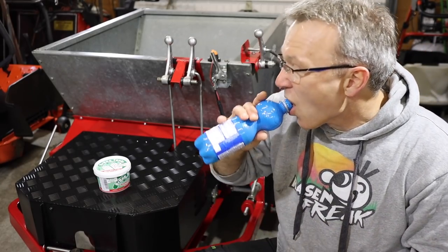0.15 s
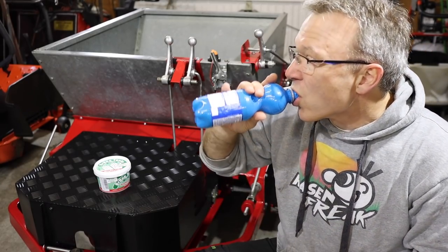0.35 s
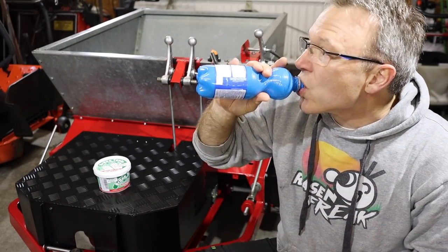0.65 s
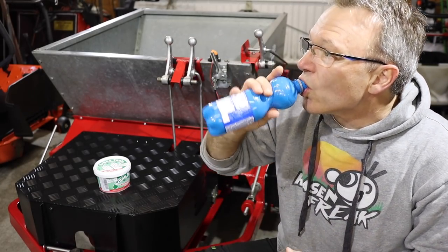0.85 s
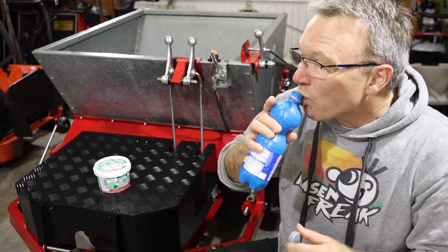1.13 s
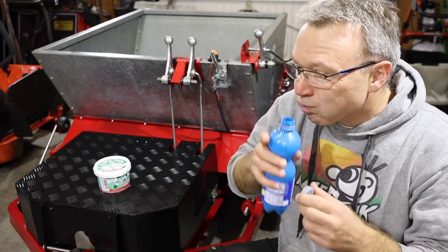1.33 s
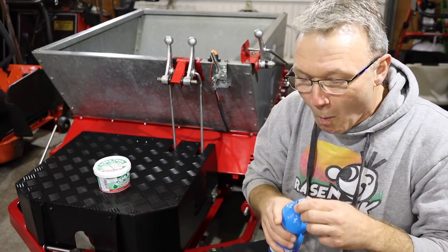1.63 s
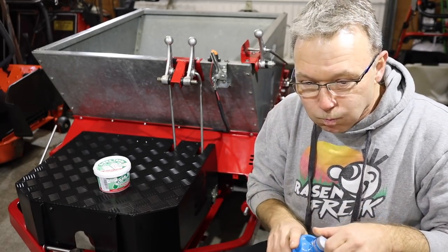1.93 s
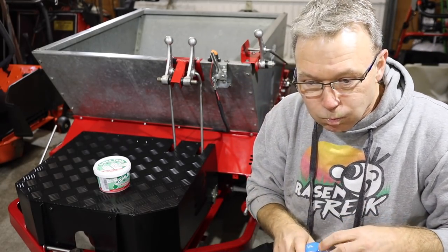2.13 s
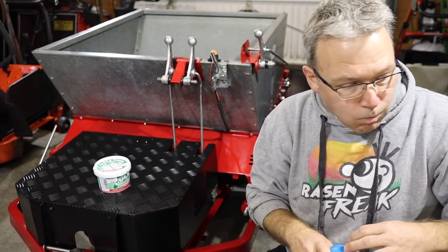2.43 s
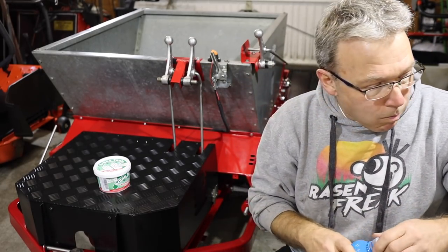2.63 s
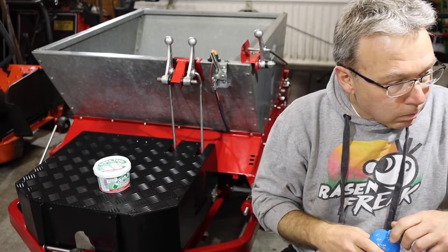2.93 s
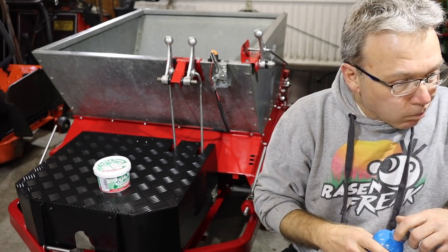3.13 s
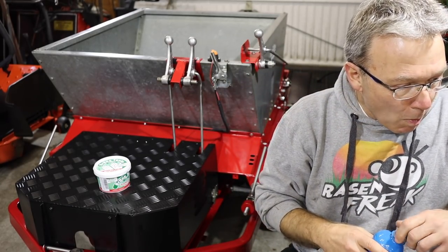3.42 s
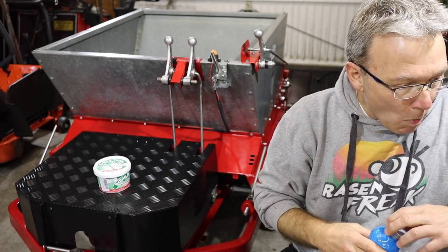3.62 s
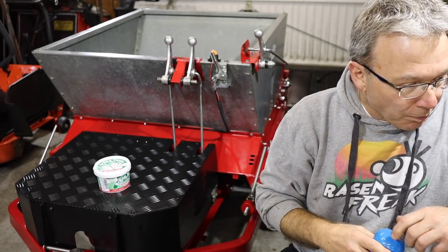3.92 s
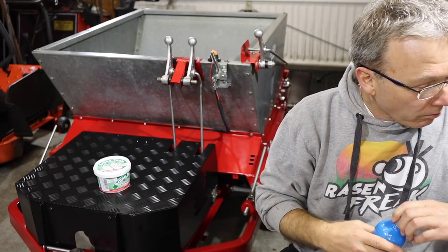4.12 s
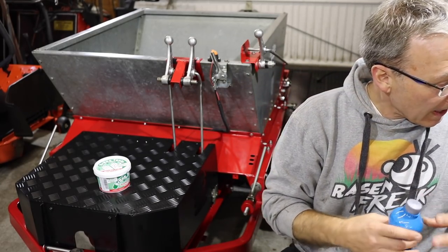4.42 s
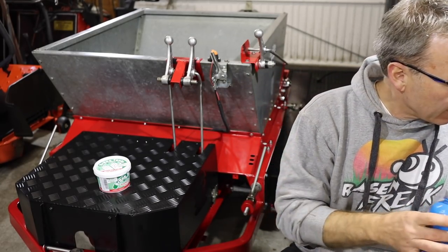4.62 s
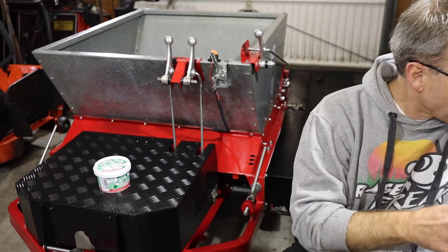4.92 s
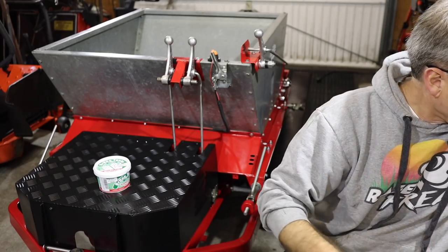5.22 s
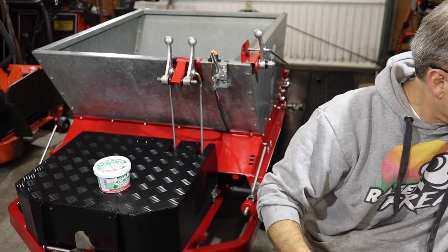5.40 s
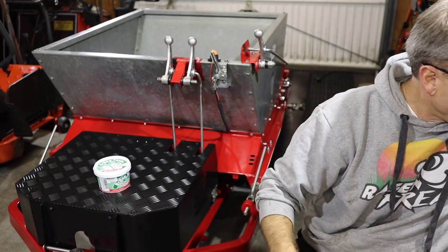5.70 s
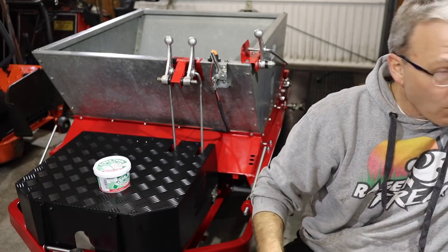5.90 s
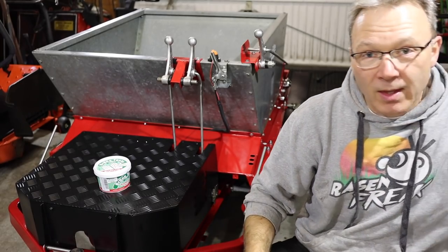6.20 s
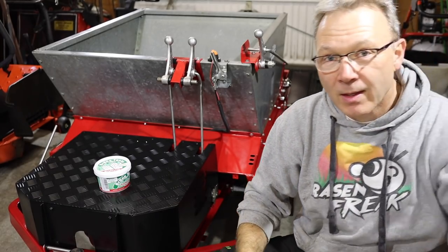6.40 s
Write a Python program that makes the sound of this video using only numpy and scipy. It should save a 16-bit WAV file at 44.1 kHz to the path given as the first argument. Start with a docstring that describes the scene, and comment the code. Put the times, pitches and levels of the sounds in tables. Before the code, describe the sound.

Loud, sharp plastic pops and gulping slosh from a drinks bottle, then crackly squeezing, a few clicks and cloth rustle in a quiet workshop.

```python
"""After a moment of soft hiss in a workshop, a thin plastic drinks bottle pops back loudly as the drinker lets go.
The water sloshes with ringing air pockets and small bubbles; the bottle crinkles in the hand in bursts of tiny
ringing ticks while the cap is screwed on, then it is put aside with a few clicks, knocks and short rough noises.
Snaps and rough noises are bursts of filtered noise or grains, knocks are damped notes.
The room rings briefly, a low hum grows, and the loudest snaps overload the microphone."""
import sys
import numpy as np
from scipy import signal
from scipy.fft import rfft, irfft, next_fast_len
from scipy.io import wavfile

SR = 44100
rng = np.random.default_rng(int(sys.argv[2]) if len(sys.argv) > 2 else 0)


def master(y):
    """Save y as 16-bit WAV."""
    cut = np.clip(np.atleast_2d(y).T, -1, 1)
    pcm = np.round(cut * 32767)  # scale
    wavfile.write(sys.argv[1], SR, pcm.astype(np.int16))


N = 288855
T = np.arange(N) / SR  # time of every sample, s


def amp(db):
    """Decibels to gain."""
    return 10 ** (np.asarray(db) / 20)


def unit(x):
    """Scale to an average strength (rms) of 1."""
    return x / np.sqrt(np.mean(x ** 2) + 1e-20)


def along(points, hz):
    """Read a curve of (Hz, value) points, with pitch on a log axis."""
    f, v = np.transpose(points)
    return np.interp(np.log(hz + 1), np.log(f + 1), v)


def level(rows, **ends):
    """Gain per sample from (s, dB) rows."""
    return amp(np.interp(T, *np.transpose(rows), **ends))


def colour(x, gain_db):
    """Filter x by a gain in dB that depends on frequency, with no sound ahead of its cause."""
    m = 2 * next_fast_len(len(x) // 2 + 2048)
    wanted_gain = amp(gain_db(np.fft.rfftfreq(m, 1 / SR)))
    # folding the cepstrum forward in time makes the filter minimum-phase
    cepstrum = irfft(np.log(wanted_gain + 1e-6), m)
    cepstrum[1:m // 2] *= 2
    cepstrum[m // 2 + 1:] = 0
    return irfft(rfft(x, m) * np.exp(rfft(cepstrum)), m)[:len(x)]


def shaped(x, points):
    """Filter x by a curve of (Hz, dB) points and scale it to rms 1."""
    return unit(colour(x, lambda hz: along(points, hz)))


def hump(hz, centre, octaves, depth_db):
    """A broad resonance in dB: 0 at its top, with skirts depth_db lower."""
    distance = np.log2((hz + 1) / centre) / octaves
    return depth_db * (np.exp(-.5 * distance ** 2) - 1)


def sized(x, db, length):
    """Give x the energy of a steady sound at db that lasts length seconds."""
    return x * amp(db) * np.sqrt(length * SR / np.sum(x ** 2))


def add(track, s, x):
    """Mix x into the track at time s."""
    part = track[max(round(s * SR), 0):][:len(x)]
    part += x[:len(part)]


def grains(size, rate, spread_db):
    """Tiny impulses at random times, about rate a second, of either sign and uneven strength."""
    present = rng.random(size) < rate / SR
    sign = rng.choice([-1, 1], size)
    return present * sign * amp(spread_db * np.clip(rng.standard_normal(size), -2, 2))


def patter(rate, pitch_hz, octaves, cycles, spread_db, rise):
    """A shower of tiny ringing grains, each at its own pitch around pitch_hz and its own strength; rms 1."""
    draws = rng.standard_normal((int(rate * N / SR), 2))
    start = rng.integers(N, size=len(draws))
    middle_hz = np.broadcast_to(pitch_hz, N)[start]
    hz = np.clip(middle_hz * 2 ** (octaves * draws[:, 0]), 150, SR / 3)[:, None]
    k = np.arange(SR // 64)
    turns = hz * k / SR
    age = np.minimum(turns / cycles, 2)
    strength_db = spread_db * np.clip(draws[:, 1:], -2, 2)
    # high grains are shorter, so they start stronger
    rings = np.sin(2 * np.pi * turns * (1 + rise * age)) * amp(-40 * age + strength_db) * np.sqrt(hz)
    return unit(np.bincount((start[:, None] + k).ravel(), rings.ravel(), N)[:N])


def swells(rows, release):
    """Gain per sample for (s, dB, build-up s) gestures: each grows to its peak and dies away."""
    power = np.zeros(N)
    for s, db, build, *_ in rows:
        shape = np.exp(-np.where(T < s, ((s - T) / build) ** 2, (T - s) / release))
        power += (amp(db) * shape) ** 2
    return np.sqrt(power)


def gripped(hz):
    """The lift in dB that the modes of the bottle, gripped in the lap, give to each frequency."""
    # modes: pitch_hz, width_hz, strength_db (against the unlifted sound)
    modes = [(1330, 150, -0.5), (2095, 470, 9), (3510, 140, 5.5), (3994, 157, 9.5), (5540, 120, 7)]
    power = 1
    for centre, width, db in modes:
        power = power + amp(2 * db) / (1 + (2 * (hz - centre) / width) ** 2)
    return 10 * np.log10(power)


def room(x, build=0.00073):
    """The workshop's diffuse answer, with twice the energy of x for flat sound; it builds up within build seconds."""
    # colour of the answer as it starts: pitch_hz, level_db (per Hz)
    start_colour = [(60, -62), (170, 8), (380, 1), (800, 1.5), (5000, 0.5), (8500, 0.5), (11000, 1),
                    (16000, 6)]
    # how long each pitch takes to fade by 60 dB, shortest at the top: pitch_hz, fade_s
    fade_times = [(200, 0.25), (530, 0.42), (1400, 0.41), (3700, 0.36), (9700, 0.33), (16000, 0.19)]
    hz, t, noise = signal.stft(rng.standard_normal(SR // 2), SR, nperseg=256)
    fade_db = -60 * t / along(fade_times, hz)[:, None]
    tail = signal.istft(noise * amp(along(start_colour, hz)[:, None] + fade_db), SR)[1]
    tail *= 1 - np.exp(-(np.arange(len(tail)) / SR / build) ** 2)
    return signal.fftconvolve(x, tail * np.sqrt(2) / np.linalg.norm(tail))


def background(air_db=-49.0, sleeve_trim_db=-5, hum_hz=70, whine_hz=1001, whine_db=-68):
    """Filtered noise for hiss, two sines for hum and thin whine, and fine grains for a rustling sweatshirt."""
    # colour of the hiss: pitch_hz, level_db (per Hz)
    air_colour = [(20, 1), (60, -13), (150, -0.5), (400, -2), (1000, -3.5), (2000, -4.5), (5000, -6),
                  (9000, -7), (16000, -13)]
    # loudness of the hum: time_s, level_db
    hum_level = [(2.8, -73), (3.6, -67), (5.5, -63.5), (6.55, -57)]
    # loudness of the rustle ahead of sleeve_trim_db: time_s, level_db
    sleeve_level = [(3.9, -59), (4.0, -47), (5.25, -45.5), (5.45, -51.5), (5.69, -38.5), (5.88, -50.5),
                    (6.2, -41)]
    # colour of the rustle: pitch_hz, level_db (per Hz)
    cloth_colour = [(100, -6), (500, -10), (1500, -5.5), (3000, -6), (7000, -6.5), (16000, -19)]
    air = amp(air_db) * shaped(rng.standard_normal(N), air_colour)
    # a sine needs a peak of sqrt(2) for rms 1
    hum = np.sqrt(2) * level(hum_level) * np.sin(2 * np.pi * hum_hz * T)
    whine = np.sqrt(2) * amp(whine_db) * np.sin(2 * np.pi * whine_hz * T)
    rustle = shaped(grains(N, rate=5000, spread_db=4), cloth_colour)
    sleeve = amp(sleeve_trim_db) * level(sleeve_level, left=-120) * rustle
    return air + hum + whine + sleeve


def water(cycles=8, rise=0.079, splash=0.56, glug_trim_db=-1.5, slosh_trim_db=-6, spray_db=-6, room_db=-5):
    """Large pockets of air ring for a few cycles; each swirl sheds small bubbles that chirp upward."""
    # slaps inside the bottle, ahead of glug_trim_db: start_s, level_db, trapped_air_pitch_hz
    glugs = [(0.582, -46.5, 306), (0.641, -40.5, 790), (0.694, -19, 380), (.711, -24, 557),
             (.717, -14.5, 750), (.881, -32, 362), (1.127, -25.5, 400), (1.152, -19.5, 394),
             (1.159, -26.5, 238), (1.241, -29.5, 382), (1.325, -29.5, 363), (1.387, -34, 1380),
             (1.438, -26.5, 355), (1.515, -26, 1160), (1.612, -33.5, 361), (1.805, -36.5, 304),
             (1.92, -33.5, 417), (2.149, -29, 376), (2.217, -33.5, 248), (2.381, -39, 234),
             (2.597, -38, 217), (2.925, -34, 400), (3.14, -39.5, 218), (3.296, -31.5, 248),
             (3.302, -35, 550), (3.342, -32, 392), (3.365, -33.5, 350), (4.204, -41.5, 440),
             (5.59, -40.5, 482)]
    # swirls sent by each tilt, ahead of slosh_trim_db: crest_s, level_db, build_up_s, bubble_pitch_hz
    swirls = [(0.73, -32, 0.022, 650), (1.17, -32.5, 0.054, 340), (1.323, -34.5, 0.038, 506),
              (1.441, -27.5, 0.03, 500), (1.515, -31.5, .04, 1073), (2.01, -30.5, 0.036, 605),
              (2.145, -33, 0.05, 443), (2.72, -49.5, 0.36, 335), (3.31, -36, .015, 430),
              (3.39, -39, 0.04, 444), (4.55, -46.5, .1, 352)]
    # colour of splashing water: pitch_hz, level_db (per Hz)
    water_colour = [(90, -34.5), (220, -0.5), (400, 5), (700, -4.5), (1300, -1.5), (3500, -12.5),
                    (7000, -21), (15000, -95)]
    settle_s = 0.04  # time for a swirl to lose two thirds of its strength
    out, t = np.zeros(N), np.arange(SR // 8) / SR
    for s, db, pocket_hz in glugs:
        age = t * pocket_hz / cycles
        bubble = np.sin(2 * np.pi * pocket_hz * t * (1 + rise * np.minimum(age, 1))) * amp(-30 * age)
        # the slap that traps the air is loudest near the pocket's own pitch
        slap_tone = lambda hz: along(water_colour, hz) + hump(hz, pocket_hz, 1.0, depth_db=8.0)
        slap = unit(colour(rng.standard_normal(len(t)), slap_tone)) * amp(-60 * t / 0.038)
        glug = (bubble + splash * slap) * (1 - np.exp(-t / 0.0018))  # soft start
        add(out, s, sized(glug, db + glug_trim_db, .01))
    crests, _, _, bubble_hz = np.transpose(swirls)
    pitch_path = np.interp(T, crests, bubble_hz)
    bubbles = patter(rate=200, pitch_hz=pitch_path, octaves=0.65, cycles=14, spread_db=5.5, rise=0.17)
    bubbles = shaped(bubbles, [(80, -16), (200, 1)])  # a small bottle radiates no deep bass
    spray = amp(spray_db) * shaped(grains(N, rate=770, spread_db=4), water_colour)
    out += amp(slosh_trim_db) * swells(swirls, settle_s) * (bubbles + spray)
    return out + amp(room_db) * room(out)[:N]


def rough_noises(room_db=-3, trim_db=-1, widen=1.19):
    """Short rough noises in quick runs of grains: rubs, brief splashes and a last smack, perhaps of lips."""
    # runs of grains, ahead of trim_db and widen: start_s, level_db, length_s, centre_hz, width_octaves
    runs = [(0.696, -18, 0.029, 3200, 1.55), (1.112, -27, 0.039, 3260, 1.7),
            (1.296, -39.5, 0.026, 1200, 0.87), (1.401, -41.5, 0.032, 2280, 0.85),
            (1.48, -36, 0.037, 1580, 1.03), (1.991, -41.5, 0.041, 1210, 1.2),
            (2.594, -27.5, 0.013, 4300, 0.23), (3.635, -33, 0.012, 3640, 1.3),
            (3.858, -33, 0.014, 920, 1.34), (3.863, -33.5, 0.021, 6500, 0.9),
            (3.919, -44, 0.061, 5800, 0.7), (4.117, -44, 0.011, 1500, 1.6),
            (4.277, -43, 0.0068, 1150, 0.45), (4.352, -33, 0.011, 780, 1.1),
            (4.353, -32.5, 0.011, 4260, 0.93), (5.204, -22, 0.0058, 1450, 1.5),
            (5.225, -20.5, 0.007, 2160, 2.7), (5.355, -23.5, 0.023, 5700, 0.47),
            (5.384, -31.5, 0.015, 7300, 1.26), (5.617, -45.5, 0.031, 1450, 0.82),
            (5.698, -24, 0.032, 1390, 1.4), (5.702, -28, 0.0087, 5900, 0.31),
            (6.151, -33.5, 0.028, 5100, 0.83), (6.156, -29.5, 0.022, 7460, 0.42)]
    overall_tone = [(60, -26), (300, 0), (9000, -0.5), (16000, -15.5)]  # (Hz, dB)
    out, t = np.zeros(N), np.arange(SR // 8) / SR
    for s, db, length, centre_hz, octaves in runs:
        rise_and_fall = (1 - np.exp(-6 * t / length)) * np.exp(-(t / length) ** 3)
        run = rise_and_fall * grains(len(t), rate=3800, spread_db=5.5)
        band = lambda hz: hump(hz, centre_hz, widen * octaves, depth_db=23.5) + along(overall_tone, hz)
        noise = sized(colour(run, band), db + trim_db, length)
        add(out, s, noise)
        add(out, s, amp(room_db) * room(noise))
    return out


def knocks(trim_db=-3.0, room_db=-10):
    """Each knock or thump is one well-damped note that swells within a cycle."""
    # hollow knocks, pings, dull bumps, and low thumps of the overloaded microphone under the loudest snaps,
    # ahead of trim_db: start_s, level_db, pitch_hz, fade_by_60_db_s
    notes = [(0.6581, -20, 1730, 0.017), (0.659, -11, 7840, 0.0066), (0.692, -40, 80, 0.032),
             (0.998, -13, 1330, 0.0053), (0.9963, -35, 61, 0.028), (1.103, -36.5, 190, 0.073),
             (3.862, -32.5, 520, 0.024), (3.863, -43, 1000, 0.018), (4.353, -27, 558, 0.036),
             (4.352, -26, 1070, 0.013), (5.134, -32.5, 1480, 0.02), (5.134, -36.5, 660, 0.033),
             (5.292, -38, 650, 0.039), (5.777, -42, 172, 0.1), (5.78, -39, 84, 0.22),
             (5.965, -48, 157, 0.08)]
    out, t = np.zeros(N), np.arange(SR // 5) / SR
    for s, db, hz, t60 in notes:
        note = np.sin(2 * np.pi * hz * t) * (1 - np.exp(-2 * hz * t)) * amp(-60 * t / t60)
        add(out, s, sized(note, db + trim_db, .01))
    return out + amp(room_db) * room(out)[:N]


def crinkle(trim_db=-5, room_db=-4, snap_t60=0.0092):
    """Under each squeeze tiny creases give way and ring the gripped bottle, with stray snaps among them."""
    # squeezes of the hand, ahead of trim_db: peak_s, level_db, build_up_s
    squeezes = [(0.74, -28, 0.054), (1.16, -28.5, 0.079), (2.11, -30, 0.038), (2.26, -26.5, 0.078),
                (2.49, -32, 0.15), (2.61, -26, 0.042), (2.78, -30, 0.065), (2.96, -25.5, 0.007),
                (3.15, -30.5, 0.041), (3.31, -32.5, 0.051), (3.4, -34, .02), (3.57, -32, .07),
                (4.83, -49, .1)]
    # colour of the creases: pitch_hz, level_db (per Hz)
    crease_colour = [(150, -10), (300, 0.5), (900, -2), (2000, -5), (4000, 0), (6000, -1.5), (9000, -2),
                     (11000, -16), (16000, -10)]
    release_s = 0.03  # time for the creases to lose two thirds of their strength
    stray_per_s, stray_db = 90, -4  # level against the ticks
    ticks = patter(rate=600, pitch_hz=3600, octaves=1, cycles=4, spread_db=5, rise=0)
    t = np.arange(SR // 64) / SR
    flip = rng.standard_normal(len(t)) * amp(-60 * t / snap_t60)
    stray = unit(signal.fftconvolve(grains(N, rate=stray_per_s, spread_db=3), flip)[:N])
    ringing = shaped(colour(ticks + amp(stray_db) * stray, gripped), crease_colour)
    creases = ringing * swells(squeezes, release_s) * amp(trim_db)
    return creases + amp(room_db) * room(creases)[:N]


def snaps(crack_t60=0.0032, held_t60=0.011, ring_t60=0.029, ring_db=-18, bounce_s=0.0044, bounce_db=-10):
    """A panel flips with a crack and rings briefly; a near surface throws the crack back."""
    # the wall buckles or is tapped: start_s, level_db, panel_pitch_hz,
    # knock_db (bass, ahead of a 6 dB lift), edge_db (treble, ahead of a 5 dB lift)
    flips = [(0.659, -10, 7200, -8.5, -13), (0.6924, -6.5, 5030, 0, 0.5), (0.6952, -27, 3800, 4, -26),
             (0.707, -11.5, 4330, 0.5, -17), (0.7178, -13, 2520, 4.5, -20), (0.7401, -19, 3600, 8, -20),
             (0.8278, -23.5, 7000, -14, 1), (0.9073, -31, 3230, 7, -14), (0.9546, -31, 4740, -10, 0),
             (0.9986, -5.5, 4500, -10.5, 0), (1.1096, -31, 7300, -18, 11), (1.127, -15.5, 7340, -7, 11),
             (1.135, -14.5, 3250, -4, -27), (1.152, -10.5, 4900, -8, -6), (1.1551, -10.5, 4760, -32, -18),
             (1.257, -36, 5200, -14, 6), (1.4775, -37, 2560, -8, 0), (1.596, -20, 4330, -19, -17.5),
             (1.8313, -29, 3500, -2, -8), (1.8513, -29, 2660, -1, -23), (1.9191, -30, 1580, 6, -21),
             (2.1186, -26.5, 3520, -20, -10), (2.182, -28.5, 3000, 0, -4), (2.2124, -25.5, 4200, -9, -6),
             (2.238, -20, 2840, -29, -4), (2.2578, -26, 2830, -17, -27), (2.3825, -29, 2020, -6, -12),
             (2.4369, -29.5, 2010, 7, -30), (2.4648, -23.5, 3520, -1, -29), (2.4742, -28, 5230, -18, 14),
             (2.499, -25.5, 3020, -18, -7), (2.5676, -21.5, 2390, -19, -16), (2.599, -22, 4200, -24, -9),
             (2.6066, -21.5, 4100, -23, 1), (2.715, -29.5, 3700, 3.5, -30), (2.754, -27.5, 2240, -11, -8),
             (2.782, -21, 3350, -11, -36), (2.8219, -30, 3800, -15, 4), (2.952, -13.5, 3300, -19, -6),
             (3.0767, -29.5, 3330, -10, -11), (3.1479, -24.5, 4600, -10, -18),
             (3.2117, -21.5, 3640, -6.5, -13), (3.261, -28.5, 3070, -12, -28),
             (3.386, -24.5, 3250, -15, -26), (3.6009, -26, 4480, 2.5, -16), (3.7887, -27.5, 4150, -13, -2),
             (4.151, -38.5, 2090, -8, -15), (4.403, -37, 2000, -8, -19), (4.6958, -33.5, 1700, 13, 2),
             (4.7941, -35.5, 3520, -22, 3), (4.823, -36, 6500, -8, -2), (4.873, -29, 4800, -24, -9),
             (4.8769, -29.5, 4500, -13, -16), (4.8817, -20.5, 4770, -10, 0), (4.9033, -19, 5450, -5, -8),
             (5.0655, -33.5, 1450, 2, -28), (5.0886, -20.5, 5670, -32, 2), (5.2051, -19, 4100, 3.5, 10),
             (5.2247, -25, 6000, -1.5, -9), (5.7182, -24, 2230, -8, -12), (6.0312, -37, 3700, -20, 1)]
    # colour of the bottle wall: pitch_hz, level_db (per Hz)
    wall_colour = [(60, -29.5), (250, -7), (800, 4.5), (1500, 4.5), (4000, 1), (6000, 0), (8200, -1),
                   (10000, -8.5), (16000, -15)]
    # when the bottle is gripped: start_s, end_s
    grip_start, grip_end = (2.0, 3.83)
    dent_octaves = .06  # each dent retunes the gripped modes by about this much
    edge_db_per_halving = 12  # the sharper a snap's edge, the shorter its crack
    snap_room_db = -4  # one room level serves all snaps
    out, t = np.zeros(N), np.arange(SR // 16) / SR
    for s, db, panel_hz, knock_db, edge_db in flips:
        held = grip_start < s < grip_end
        t60 = held_t60 if held else crack_t60  # under the fingers a panel gives way more slowly
        t60 *= 2 ** (-max(edge_db, 0) / edge_db_per_halving)
        fade = amp(-60 * t / t60) + amp(ring_db - 60 * t / ring_t60)
        flip = rng.standard_normal(len(t)) * fade
        lean = [(600, knock_db + 6.0), (1300, 0), (5800, 0), (8200, edge_db + 5.0)]  # (Hz, dB)
        dent = 2 ** rng.normal(0, dent_octaves)

        def tone(hz):
            """The panel's colour in dB: wall, lean, its own pitch and, when held, the gripped modes."""
            panel = hump(hz, panel_hz, 0.51, depth_db=7)
            return along(wall_colour, hz) + along(lean, hz) + panel + held * gripped(hz / dent)

        snap = sized(colour(flip, tone), db, 0.0038)
        add(out, s, snap)
        add(out, s + bounce_s * rng.uniform(.8, 1.15), amp(bounce_db) * snap)
        # the room gathers what leaves in all directions: the panel's smooth mean colour
        radiated = sized(colour(signal.unit_impulse(len(t)), tone), db, 0.0032)
        add(out, s, amp(snap_room_db) * room(radiated))
    return out


def scene():
    """Workshop, water and bottle at one microphone."""
    return (background() + water() + rough_noises() + knocks() + crinkle() + snaps())[None]


def record(dry, ceiling=1.0, top_hz=16100):
    """Peaks beyond the ceiling are clipped flat; then nothing is kept from top_hz up."""
    m = next_fast_len(N + SR // 4)
    spectrum = rfft(np.clip(dry, -ceiling, ceiling), m)
    return irfft(spectrum * (np.fft.rfftfreq(m, 1 / SR) < top_hz), m)[:, :N]


dry = scene()
out = record(dry)
master(out)
```